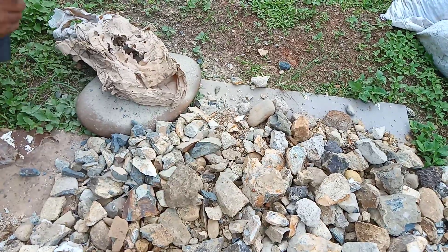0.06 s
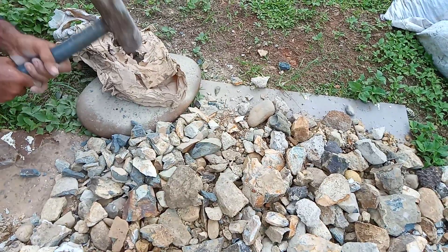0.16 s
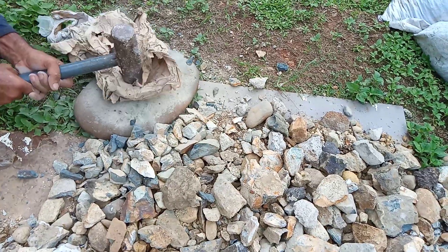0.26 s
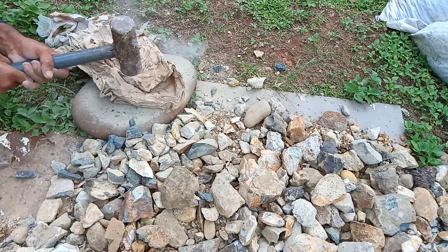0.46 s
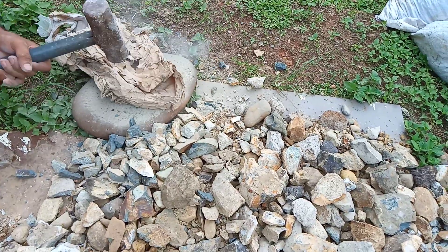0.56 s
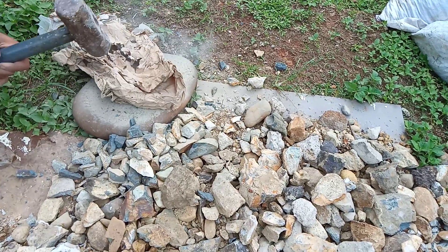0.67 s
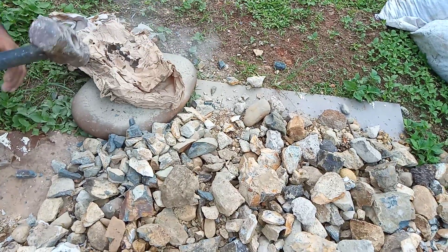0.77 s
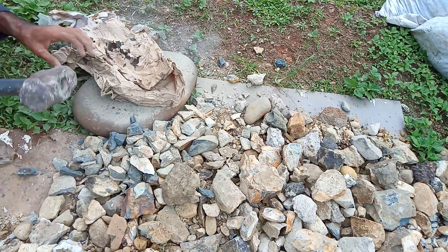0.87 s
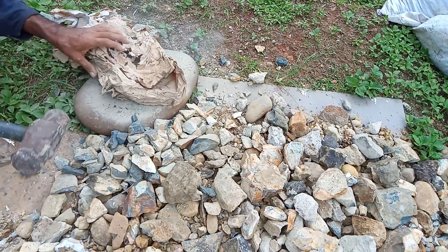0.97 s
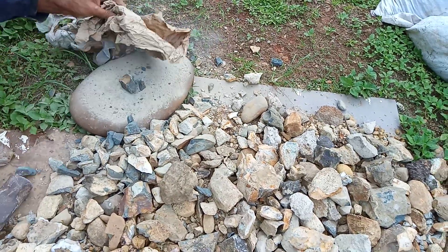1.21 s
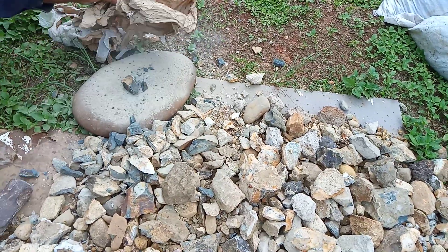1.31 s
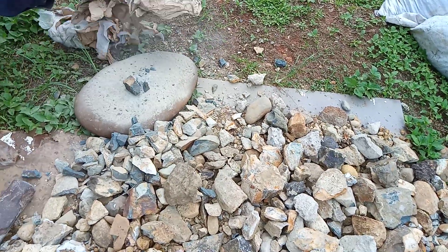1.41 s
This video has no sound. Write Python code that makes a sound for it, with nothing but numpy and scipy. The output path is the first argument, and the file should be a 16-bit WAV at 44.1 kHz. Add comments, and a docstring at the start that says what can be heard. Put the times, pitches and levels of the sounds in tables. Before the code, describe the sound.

One sharp sledgehammer blow breaks a rock, followed by clattering chips and a crackling paper sack.

```python
"""A hard crack, a heavy thud and a ring of steel: outdoors, a sledgehammer breaks a rock that lies
on a stone anvil, wrapped in a stiff paper sack. Chips clack and grit scatter and settle.
Then a hand grabs the sack and lifts it off: big folds buckle with hollow pops and small creases
crackle. A faint outdoor rumble lies underneath, all heard through one dull, close microphone."""
import sys
import numpy as np
from scipy import signal
from scipy.fft import rfft, irfft
from scipy.io import wavfile
from scipy.ndimage import uniform_filter1d, minimum_filter1d

SR = 44100
rng = np.random.default_rng(int(sys.argv[2]) if len(sys.argv) > 2 else 0)


def materialize(psi):
    """Save the field psi as 16-bit PCM at rate SR to the path in sys.argv[1].

    A 1-D psi becomes a single channel; in a 2-D psi each row is a channel.
    """
    bounded = np.clip(np.atleast_2d(psi).T, -1, 1)
    quanta = np.round(bounded * 32767).astype(np.int16)
    wavfile.write(sys.argv[1], SR, quanta)


N = 63945
BLOW_S = .2295   # steel meets stone
# the tone of brushed paper: (frequency [Hz], relative level [dB])
PAPER_SURFACE = [(150, -1.5), (400, -10.5), (1100, 5), (1900, 4.5), (2500, -4), (3600, 3.5), (15000, -1)]


def from_db(db):
    """Decibels to gain."""
    return 10 ** (np.asarray(db) / 20)


def rms_one(x):
    """Scale to rms 1."""
    return x / np.sqrt(np.mean(x ** 2) + 1e-20)


def seconds():
    """The time axis."""
    return np.arange(N) / SR


def dying(start, t60):
    """Sudden attack, then 60 dB down in t60 seconds."""
    age = seconds() - start
    return (age >= 0) * from_db(-60 * np.maximum(age, 0) / t60)


def cut(x, kind, hz, order=2):
    """Butterworth low-pass or high-pass."""
    return signal.sosfilt(signal.butter(order, hz, kind, fs=SR, output="sos"), x + 1e-18)


def colour(x, spectrum):
    """Minimum-phase EQ along a (Hz, dB) curve; white noise keeps its power."""
    size = 4096
    hz, db = np.transpose(spectrum)
    bin_hz = np.arange(size // 2 + 1) * SR / size
    gain = rms_one(from_db(np.interp(np.log(bin_hz + 1), np.log(hz), db)))
    cepstrum = irfft(np.log(gain))
    cepstrum[1:size // 2] *= 2   # folded forward, so nothing rings ahead of an attack
    cepstrum[size // 2 + 1:] = 0
    return signal.fftconvolve(x, irfft(np.exp(rfft(cepstrum))))[:N]


def noise(spectrum):
    """Steady coloured noise, rms 1."""
    return rms_one(colour(rng.standard_normal(N), spectrum))


def burst(start, t60, spectrum):
    """A dying burst of coloured noise, starting near rms 1."""
    envelope = dying(start, t60)
    coloured = colour(rng.standard_normal(N) * envelope, spectrum)
    return rms_one(coloured) * np.sqrt(np.mean(envelope ** 2))


def grains(per_s, spread_db):
    """Random clicks of uneven size, rms 1."""
    sizes = from_db(spread_db * np.minimum(rng.exponential(1, N), 4))
    signs = rng.choice([-1, 1], N)
    return rms_one(sizes * signs * (rng.random(N) < per_s / SR))


def pitched_grains(per_s, spread_db, low_hz, high_hz, q, count=12):
    """Random clicks, each ringing briefly at one of a spread of pitches; rms 1."""
    bands = (signal.lfilter(*signal.iirpeak(hz, q, fs=SR), grains(per_s / count, spread_db) + 1e-18)
             for hz in np.geomspace(low_hz, high_hz, count))
    return rms_one(sum(bands))


def knock(start, t60, hz, q, unpitched, scatter=0.6):
    """A click and its dying after-clicks through one broad resonance, duller when low."""
    envelope = dying(start, t60)
    push = scatter * rms_one(rng.standard_normal(N) * envelope) / np.sqrt(N)
    push[int(start * SR)] += 1
    push = cut(push, "low", min(4.8 * hz, .45 * SR))   # the contact carries little far above its pitch
    pitched = signal.lfilter(*signal.iirpeak(hz, q, fs=SR), push)
    return (pitched + unpitched * push) * np.sqrt(np.sum(envelope ** 2) / np.sum(pitched ** 2))


def ring(start, modes, radiation_hz=93):
    """Struck modes, each a dying sine, of a body too small to radiate deep bass."""
    age = seconds() - start
    tones = sum(from_db(db) * dying(start, t60) * np.sin(2 * np.pi * hz * age) for hz, db, t60 in modes)
    return cut(tones, "high", radiation_hz)


def air():
    """The bed: faint outdoor rumble and hiss, made slightly grainy by a fast flutter in level."""
    # the tone of the open air: (frequency [Hz], relative level [dB])
    air_tone = [(25, -13.5), (70, 10.5), (145, 10.5), (340, -14.5), (490, -10.5), (800, 1.5), (2000, 1.5),
                (3700, -5), (15000, -9.5)]
    flutter = rms_one(uniform_filter1d(rng.standard_normal(N), size=300))
    return from_db(-59 + 2.15 * flutter) * noise(air_tone)


def debris():
    """Single chips clack and splinters snap over a dying shower of grit."""
    # chips landing and small stones knocking: (time [s], relative level [dB], pitch [Hz])
    chips = [(.088, -39.5, 2900), (0.124, -41, 1900), (.154, -35, 2200), (0.1876, -29.5, 2530),
             (.255, -21, 1690), (0.3034, -19.5, 1550), (0.3096, -19, 644), (.3098, -18.5, 1430),
             (0.3313, -16.5, 3520), (0.352, -31, 617), (0.3752, -28.5, 1420), (.3995, -28, 427),
             (0.4217, -31.5, 1080), (0.4753, -30, 3500), (0.499, -27, 3340), (0.51, -34.5, 1800),
             (.673, -38.5, 3600), (.7052, -28.5, 2190), (0.7055, -31.5, 880), (.7715, -38, 1910),
             (0.8451, -38, 3600), (0.845, -39, 1240), (0.9641, -34.5, 970), (0.9646, -35, 2200),
             (1.017, -38, 3130)]
    # the tone of chips and grit: (frequency [Hz], relative level [dB])
    chip_tone = [(150, -19), (650, 6), (15000, 1)]
    # the rock splits, splinters land, fragments collide in the sack: (time [s], relative level [dB])
    snap_hits = [(0.2297, 4.5), (0.4, -16.5), (.451, -28), (0.4774, -27), (0.499, -26.5), (1.2046, -16.5),
                 (1.2452, -14), (1.2517, -17.5)]
    clacks = sum(from_db(db) * knock(s, t60=.016, hz=hz, q=4.2, unpitched=0.06) for s, db, hz in chips)
    grit = from_db(-41) * dying(BLOW_S, t60=1.46) * grains(per_s=900, spread_db=4.5)
    snap_envelope = sum(from_db(db) * dying(s, t60=0.007) for s, db in snap_hits)
    snaps = cut(snap_envelope * rng.standard_normal(N), "high", hz=4700, order=4)
    return colour(from_db(-10) * clacks + grit, chip_tone) + snaps


def sack_brush():
    """The paper slides under the hand in soft, flat-topped swells of fine friction clicks."""
    # slides: (centre time [s], half length [s], level [dB])
    slides = [(1.098, 0.056, -43.5), (1.42, 0.062, -51)]
    swells = sum(from_db(db) * np.exp(-((seconds() - s) / half) ** 4) for s, half, db in slides)
    return colour(swells * grains(per_s=9000, spread_db=3), PAPER_SURFACE)


def sack_pops():
    """The gripped sack buckles and fragments knock inside; big, low folds are the most damped."""
    # buckles and knocks: (time [s], relative level [dB], pitch [Hz], t60 [s])
    buckles = [(1.1676, -25, 2930, 0.05), (1.1768, -3, 574, 0.014), (1.177, -9, 216, 0.03),
               (1.1865, -20, 1400, 0.012), (1.1993, -6, 980, 0.022), (1.2048, -4, 1090, 0.012),
               (1.2046, -14, 3580, 0.0073), (1.2255, -18, 1540, .012), (1.245, -10, 1580, 0.071),
               (1.2478, -1.5, 1626, 0.019), (1.247, -8, 3540, 0.035), (1.2518, -2.5, 1730, 0.014),
               (1.270, -17.5, 650, 0.048), (1.2875, -17.5, 750, 0.033), (1.318, -27.5, 610, 0.1),
               (1.3395, -21, 1550, 0.018), (1.361, -24.5, 1430, 0.015), (1.378, -23, 1690, 0.028),
               (1.415, -28, 1760, 0.026)]
    # the tone of the pops: (frequency [Hz], relative level [dB])
    pop_tone = [(50, -20.5), (170, 6), (1900, 0), (3600, -4), (15000, -4)]
    top_q, damped_below_hz = 9.9, 1070
    pops = sum(from_db(db) * knock(s, t60, hz, q=top_q * hz / (hz + damped_below_hz), unpitched=0.085)
               for s, db, hz, t60 in buckles)
    return from_db(-14) * colour(pops, pop_tone)


def sack_crumple():
    """Masses of small creases crackle through the sack's hollow body."""
    # the crumpling envelope: (time [s], level [dB])
    crumple = [(1.175, -40), (1.183, -31), (1.206, -29), (1.212, -35), (1.236, -37), (1.242, -24.5),
               (1.279, -29.5), (1.302, -41.5), (1.353, -55), (1.381, -46), (1.45, -50.5)]
    # the hollow body when moved hard: (frequency [Hz], relative level [dB])
    hollow_tone = [(50, -29), (170, 2), (400, -4), (600, 6.5), (1700, 4.5), (2500, -9.5), (3500, -6),
                   (5000, -14), (15000, -14)]
    envelope = from_db(np.interp(seconds(), *np.transpose(crumple), left=-np.inf))
    creases = pitched_grains(per_s=6600, spread_db=3.5, low_hz=227, high_hz=12800, q=2.05)
    return colour(envelope * creases, hollow_tone)


def hammer_ring():
    """The steel head rings from the blow; then a chip tings off its side and wakes a single mode."""
    # the head's modes, the lowest pair beating: (frequency [Hz], level [dB], t60 [s])
    steel_modes = [(3413, -30.5, .3), (3445, -35, .24), (3919, -42, .19), (7203, -33, .42),
                   (8893, -27.5, .5)]
    ting = from_db(4) * ring(start=.3312, modes=[steel_modes[2]])
    return ring(BLOW_S, steel_modes) + ting


def hammer_blow():
    """The head squashes the paper and cracks on the rock, which breaks with a double thud."""
    # the crack of steel on stone: (frequency [Hz], relative level [dB])
    crack_tone = [(500, -17), (2500, -10.5), (3450, 7), (4200, -9), (6500, 3.5), (15500, -25)]
    # the rock gives way, then its halves hit the anvil: (time [s], level [dB])
    breaks = [(.2308, -12.5), (.2402, -24.5)]
    # the crunch of breaking rock: (frequency [Hz], relative level [dB])
    crush_tone = [(35, -14.5), (130, 1), (230, -3.5), (370, -8), (550, 4.5), (1400, 1), (2200, -11),
                  (15000, -30.5)]
    # the modes of rock and anvil: (frequency [Hz], level [dB], t60 [s])
    stone_modes = [(82, -27.5, 0.092), (140.3, -23, 0.069), (216, -15.5, 0.04), (625.6, -12, 0.035),
                   (934, -21.5, 0.057), (1297, -18.5, 0.024)]
    # the blow scattered back by the yard: (frequency [Hz], relative level [dB])
    yard_tone = [(35, -27), (90, 1.5), (200, 3.5), (400, -3.5), (1500, 2), (2500, -5), (3600, -1),
                 (15500, -0.5)]
    t, break_s, squash_s = seconds(), breaks[0][0], .0058
    squash = from_db(-27) * noise(PAPER_SURFACE) * (t > BLOW_S - squash_s) * (t < BLOW_S)
    crack = from_db(-5) * burst(BLOW_S, t60=0.029, spectrum=crack_tone)
    crush = sum(from_db(db) * burst(s, t60=.03, spectrum=crush_tone) for s, db in breaks)
    tail = from_db(-29.5) * burst(break_s, t60=0.75, spectrum=yard_tone)
    return squash + crack + crush + ring(break_s, stone_modes) + tail


def scene():
    """The blow, the debris, the sack and the air, mixed in mono."""
    smash = hammer_blow() + hammer_ring() + debris()
    sack = sack_brush() + sack_pops() + sack_crumple()
    return (smash + sack + air())[None]


def record(dry):
    """A dull microphone; a very fast limiter flattens the loudest peaks; the top is cut."""
    # the microphone, dull above 4 kHz: (frequency [Hz], relative gain [dB])
    microphone_tone = [(3850, 1.5), (5100, -22), (6400, -19), (7700, -29), (8900, -19.5), (11000, -35),
                       (15500, -35)]
    ceiling, limiter_samples, stopband_hz = 1, 17, 16800
    heard = colour(dry[0], microphone_tone)
    gain = np.minimum(1, ceiling / (np.abs(heard) + 1e-9))
    held_gain = minimum_filter1d(gain, limiter_samples)
    limited = heard * uniform_filter1d(held_gain, limiter_samples)
    top_cut = signal.cheby2(12, 70, stopband_hz, fs=SR, output="sos")
    return signal.sosfilt(top_cut, limited)[None]


dry = scene()
out = record(dry)
materialize(out)
```